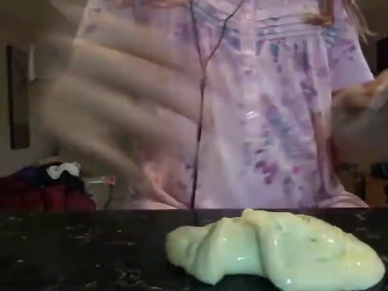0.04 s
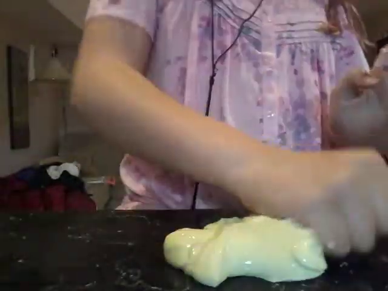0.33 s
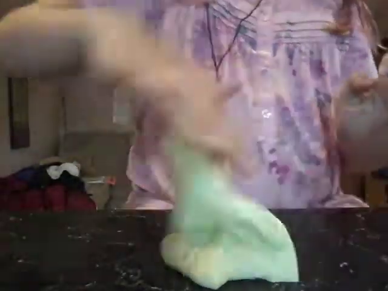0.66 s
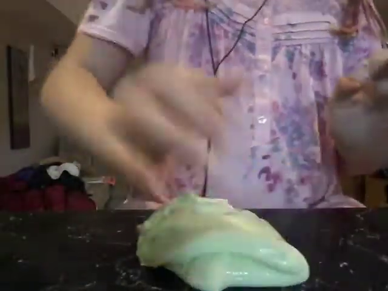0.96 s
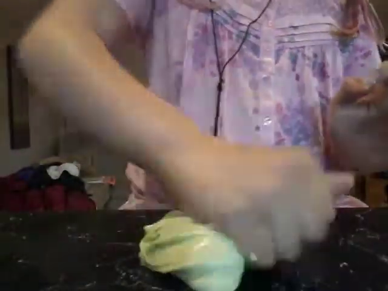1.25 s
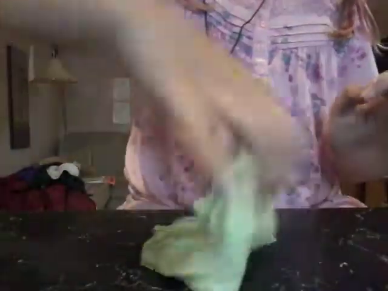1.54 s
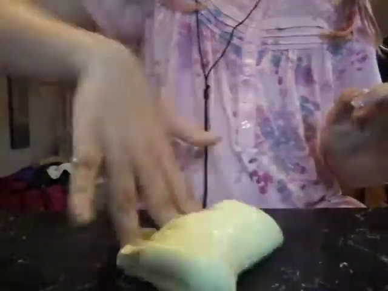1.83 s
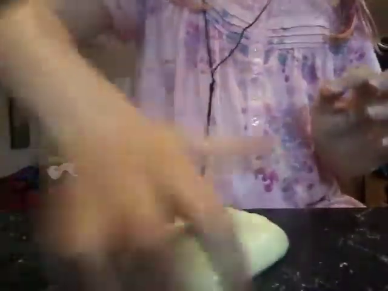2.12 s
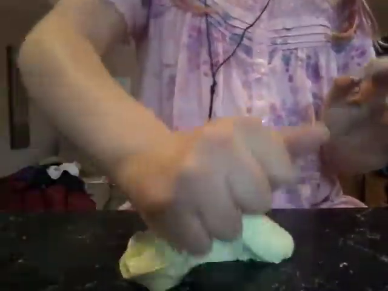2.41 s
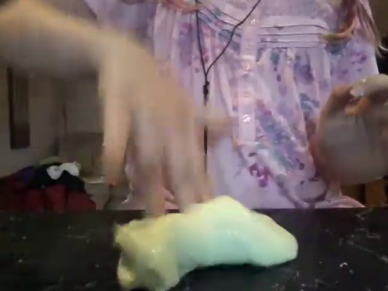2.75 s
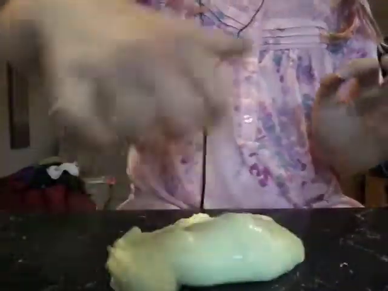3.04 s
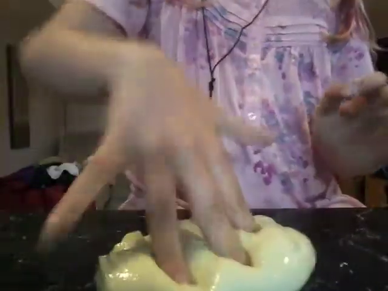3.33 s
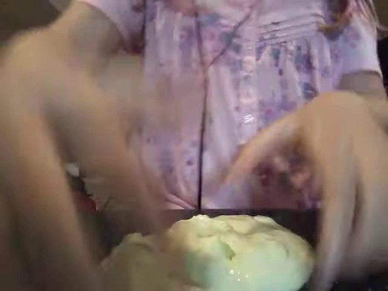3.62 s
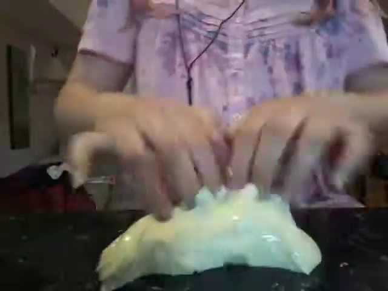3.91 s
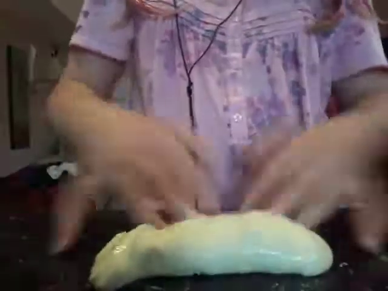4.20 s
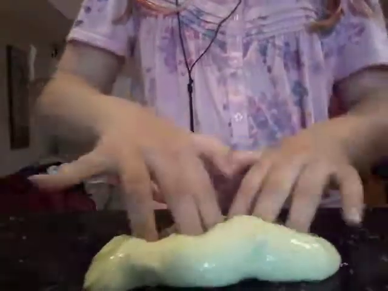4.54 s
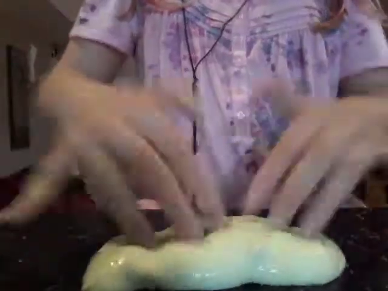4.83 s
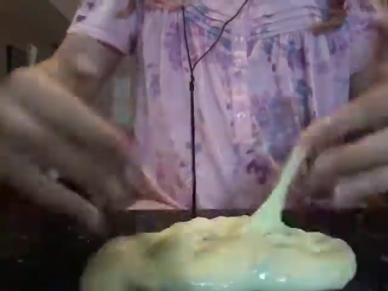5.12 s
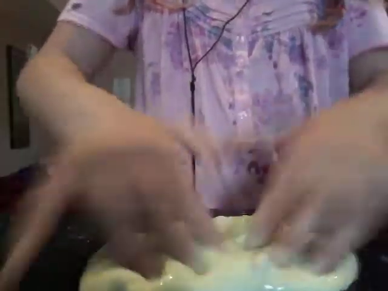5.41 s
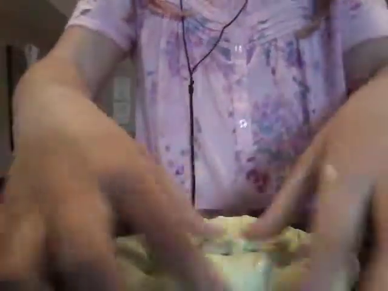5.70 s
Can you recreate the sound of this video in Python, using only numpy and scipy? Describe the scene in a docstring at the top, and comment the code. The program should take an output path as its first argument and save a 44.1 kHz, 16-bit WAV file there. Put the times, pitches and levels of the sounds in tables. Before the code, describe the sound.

Hands work sticky slime on a tabletop, right by the microphone in a small room. Three times a palm lands with a soft thud and lifts, the slime peeling off with a wet crackle and sharp snaps. In the second half, fingers poke in and pull out repeatedly, making louder squelches with hollow pops and light bumps. A last soft thud comes near the end, over very faint room noise.

```python
"""Slime on a tabletop, close up

Sticky slime is pressed, pulled and plucked by hand in a small room, right by the microphone.
Trapped air bursts in sharp snaps and hollow pops, the slime crackles as it peels off the skin,
and the hands land on the table with soft thuds. The microphone rings near 6 kHz."""
import sys
import numpy as np
from scipy import signal
from scipy.fft import rfft, irfft
from scipy.io import wavfile
from scipy.ndimage import uniform_filter1d

SR = 44100
rng = np.random.default_rng(int(sys.argv[2]) if len(sys.argv) > 2 else 0)


def to_wav(s):
    """Save 16-bit WAV."""
    ch = np.atleast_2d(s).T  # columns
    pcm = np.round(np.clip(ch, -1, 1) * 32767)  # PCM
    wavfile.write(sys.argv[1], SR, pcm.astype(np.int16))


N = 254016
EDGE_HZ = 16100  # upper band limit

# The palm comes down and squeezes the slime.
# Each row: start in seconds, level in dB, brightness in Hz, squeeze length in seconds.
PRESSES = [(.231, -29.5, 420, 0.0722), (.344, -35, 329, 0.081), (1.1553, -32, 480, 0.095),
           (2.182, -35.5, 650, 0.145), (3.719, -31, 402.8, 0.091), (5.741, -27, 880, 0.082)]
# The hand lifts and the slime peels off it.
# Each row: start and end in seconds, level in dB, typical tick pitch in Hz.
PULLS = [(.435, .512, -57, 4000), (1.315, 1.458, -54.5, 4800), (2.382, 2.514, -53, 3000)]
# Fingers come out of the slime with a squelch. Each row: start and end in seconds, level in dB.
PLUCKS = [(1.977, 2.007, -49), (2.99, 3.037, -49), (3.466, 3.516, -53), (4.28, 4.339, -34.5),
          (4.688, 4.752, -38.5), (5.09, 5.164, -39.5), (5.489, 5.556, -35.5)]


def amp(db):
    """Decibels to gain."""
    return 10 ** (np.asarray(db) / 20)


def unit_rms(x):
    """Scales to rms 1."""
    return x / np.sqrt(np.mean(x ** 2) + 1e-20)


def curve_at(points, hz):
    """Reads a curve on a log-frequency axis."""
    f, value = np.transpose(points)
    return np.interp(np.log(hz + 1), np.log(f + 1), value)


def seconds(size):
    """A time axis of so many samples."""
    return np.arange(size) / SR


def add(mix, start_s, sound):
    """Mixes a sound in at a time."""
    part = mix[max(round(start_s * SR), 0):][:len(sound)]
    part += sound[:len(part)]


def band(x, hz, kind, order=2):
    """Butterworth filter."""
    return signal.sosfilt(signal.butter(order, np.minimum(hz, SR / 2 - 1), kind, fs=SR, output="sos"), x)


def colour(x, points, size=4096):
    """Causal filter with the given spectrum: it rings only after a click."""
    log_gain = np.log(amp(curve_at(points, abs(np.fft.fftfreq(size, 1 / SR)))))
    minimum_phase = np.exp(np.conj(signal.hilbert(log_gain)))
    taps = np.fft.ifft(minimum_phase).real
    return signal.oaconvolve(x, taps[:size // 2])[:len(x)]


def room_tone(floor_db=-70, waver=0.28):
    """Steady room noise with a little wavering mains hum."""
    # The noise floor. Each row: frequency in Hz, relative density in dB.
    floor = [(20, -15), (62, 2), (95, -6.5), (200, -4.5), (700, -4.5), (1500, -12), (3500, -12),
             (6300, -31.5), (10000, -17), (16000, -17.5)]
    # The mains. Each row: frequency in Hz, rms level in dB.
    partials = [(59.8, -69.5), (120, -83.5), (300, -87)]
    t = seconds(N)
    hum = sum(amp(db) * np.sqrt(2) * np.sin(2 * np.pi * (hz * t + rng.random())) for hz, db in partials)
    hum *= 1 + waver * unit_rms(band(rng.standard_normal(N), 1.5, "lowpass"))
    return hum + amp(floor_db) * unit_rms(colour(rng.standard_normal(N), floor))


def room_tail(build_s=0.0037, size=26460, step=11):
    """Sparse reflections of random sign, each band dying at its own speed."""
    # The room's decay. Each row: frequency in Hz, seconds to fall 60 dB.
    t60 = [(150, 0.5), (1000, 0.3057), (6500, 0.3033), (10000, 0.1733), (16000, 0.459)]
    # The room's colour. Each row: frequency in Hz, gain in dB.
    tone = [(60, 1.5), (200, 0), (1500, -0.5), (5000, 1.5), (6700, -1.5), (9000, 4.5), (16000, -9)]
    taps = np.zeros(size)
    slots = np.arange(0, size - step, step)
    taps[slots + rng.integers(0, step, len(slots))] = rng.choice([-1., 1.], len(slots))
    hz, t, bands = signal.stft(taps, SR, nperseg=256)
    bands = bands * amp(-60 * t / curve_at(t60, hz)[:, None])
    onset = (1 - np.exp(-seconds(size) / build_s)) ** 2
    tail = signal.istft(bands, SR)[1][:size] * onset
    return colour(tail / np.linalg.norm(tail), tone)


def dying_smack(db=-4, top_hz=5000):
    """The room still rings from a smack just before the scene begins."""
    out = np.zeros(N)
    add(out, 0, amp(db) * band(room_tail()[SR // 50:], top_hz, "lowpass"))
    return out


def room(x, tails=3):
    """Direct sound, single echoes from table and body, and a tail that changes as the hands move."""
    # Near surfaces. Each row: delay in seconds, gain.
    echoes = [(.0012, 0.057), (.0021, 0.13), (.0071, 0.14), (.0096, 0.084)]
    # The share thrown into the room. Each row: time in seconds, gain in dB.
    spill = [(.44, -9), (.515, -11), (.93, -9.5), (3, -12.5), (4.3, -10.5), (5.15, -9.5), (5.54, -12.5)]
    out = x.copy()
    for delay, gain in echoes:
        add(out, delay, gain * x)
    sent = x * amp(np.interp(seconds(N), *np.transpose(spill)))
    turn = (np.arange(N) // (SR // 100)) % tails  # the tails take turns every 10 ms
    for k in range(tails):
        out += signal.oaconvolve(sent * (turn == k), room_tail())[:N]
    return out


def blows(settle_s=0.013, settle_hz=197.46, drop_s=0.016, drop_hz=454):
    """The palm lands, then the hand's weight, duller; plucked slime drops back on the table."""
    # Each row: start in seconds, level in dB, brightness in Hz.
    palms = [(start, db, hz) for start, db, hz, _ in PRESSES]
    weights = [(start + settle_s, db - 0.5, settle_hz) for start, db, _ in palms]
    drops = [(start + drop_s, db + 8.5, drop_hz) for start, _, db in PLUCKS]
    return palms + weights + drops


def thuds(slap_db=-20, slap_decay_s=0.009, low_cut_hz=130, detune=0.2):
    """A cushioned blow rings the table, detuned as the hand loads it; wet skin adds a faint slap."""
    # The tabletop's modes. Each row: frequency in Hz, relative level in dB, decay in seconds.
    modes = [(184.8, -21, 0.024), (214.77, -12.5, 0.011), (299.1, -11, 0.0032), (571, -1.5, .003),
             (1620, 1, 0.0013)]
    out, t = np.zeros(N), seconds(size=6000)
    for start, db, bright_hz in blows():
        loads = 1 + detune * rng.uniform(-0.9, 1, len(modes))
        ring = sum(amp(mode_db) * np.sin(2 * np.pi * hz * load * t) * np.exp(-t / decay)
                   for (hz, mode_db, decay), load in zip(modes, loads))
        knock = band(ring, bright_hz, "lowpass", order=1)
        slap = band(rng.standard_normal(len(t)), 2 * bright_hz, "lowpass", order=1)
        slap *= np.exp(-t / slap_decay_s)
        add(out, start, amp(db) * (knock / abs(knock).max() + amp(slap_db) * slap))
    return band(out, low_cut_hz, "highpass", order=5)


def showers(squeeze_hz=8200, sag_hz=4946, seethe_hz=1384, squelch_hz=2295):
    """Every spell of crackle that the hands cause."""
    spells = []  # Each row: start and end in seconds, level in dB, typical tick pitch in Hz.
    for start, db, _, length in PRESSES:
        spells.append((start, start + length, db - 33, squeeze_hz))  # air fizzes from under the palm
    for start, end, db, hz in PULLS:
        sag_start = end + 0.04
        spells += [(start, end, db, hz),
                   (sag_start, sag_start + 0.135, -64, sag_hz)]  # stretched threads sag back
    for start, end, db in PLUCKS:
        spells += [(start - 0.1, start, db - 40, seethe_hz),  # slime seethes round the fingers,
                   (start - 0.012, start, db - 21.5, squelch_hz),  # starts to let go,
                   (start, end, db, squelch_hz)]  # then squelches
    return spells


def peeling(ticks_per_s=1300, spread_octaves=2, spread_db=4.5, decay_cycles=1.5):
    """Threads and tiny bubbles let go of skin and table: showers of short rings of mixed size and pitch."""
    out, t = np.zeros(N), seconds(SR // 100)
    for start, end, db, hz in showers():
        length = end - start
        shower = np.zeros(round(length * SR) + len(t))
        for place, size, up, down in rng.random((int(length * ticks_per_s), 4)):
            swell = np.sqrt(np.sin(np.pi * place))
            size_db = spread_db * min(-np.log(1 - size), 3)  # many small ticks, a few large
            pitch = min(hz * 2 ** (spread_octaves * (up - down)), EDGE_HZ)
            tick = np.sin(2 * np.pi * pitch * t) * np.exp(-t * pitch / decay_cycles)
            add(shower, place * length, swell * amp(size_db) * unit_rms(tick))
        add(out, start, amp(db) * unit_rms(shower))
    return out


def taut(time_s):
    """Whether a pull is stretching the slime at this moment."""
    return any(start <= time_s <= end for start, end, _, _ in PULLS)


def pops(rise=0.036, opening_s=0.00065, roughness=0.6075, torn_cycles=1, resting_cycles=3.496):
    """An air pocket rings as a damped cavity; its pitch rises as the opening widens."""
    # Pockets venting round the fingers. Each row: start in seconds, level in dB, pitch in Hz.
    pockets = [(0.3427, -22.5, 4260), (0.4395, -13, 1090), (0.4673, -24.5, 859), (.757, -42, 620),
               (.9336, -25.5, 1333), (0.9352, -21, 4420), (.937, -30, 796), (1.325, -19, 3920),
               (1.389, -6.5, 4080), (1.51, -45.5, 925), (1.9745, -27.5, 515.5), (1.987, -34.5, 436.7),
               (2.397, -32.5, 818), (3.0007, -23, 800.4), (3.008, -32, 589), (3.009, -25, 3540),
               (3.445, -39, 794), (3.4594, -29.5, 732.3), (3.4911, -26.5, 2631), (3.509, -34.5, 636.5),
               (4.275, -30, 537), (4.297, -19.5, 839), (4.681, -22.5, 472.3), (4.69, -24, 676.4),
               (4.693, -28, 320.5), (4.702, -22, 747.6), (5.11, -21.5, 645.7), (5.1197, -19, 789),
               (5.139, -15.5, 1286), (5.49, -32.5, 556.5), (5.5235, -18, 1092), (5.547, -19.5, 2255)]
    out, t = np.zeros(N), seconds(size=3000)
    for start, db, hz in pockets:
        decay = (torn_cycles if taut(start) else resting_cycles) / hz  # a pull tears it wide open
        fade = np.exp(-t / decay)
        onset = 1 - np.exp(-t / opening_s)
        pitch = hz * (1 + rise * (1 - 2 * fade))
        flutter = unit_rms(band(rng.standard_normal(len(t)), [hz / 2, hz * 2], "bandpass"))
        ring = np.sin(2 * np.pi * np.cumsum(pitch) / SR) + roughness * flutter
        add(out, start, amp(db) * ring * fade * onset)
    return band(out, 120, "highpass", order=1)


def film_tear(decay_s, size=441):
    """A noise burst of tearing film, its spectrum levelled so that chance does not colour it."""
    burst = rng.standard_normal(size) * np.exp(-seconds(size) / decay_s)
    spectrum = rfft(burst, 2 * size)
    spectrum /= np.sqrt(uniform_filter1d(abs(spectrum) ** 2, size=25) + 1e-12)
    return irfft(spectrum)[:size]


def snaps(trim_db=-1, stretched_hz=2450, resting_hz=2156, band_ratio=2.081):
    """Each film tears with a crack and a fizz; the bubble behind it rings, higher when stretched."""
    # Films of slime bursting. Each row: start in seconds, crack level in dB,
    # bubble and fizz levels in dB relative to the crack, decay in seconds.
    films = [(0.3298, -57.5, -4, -3.5, 0.00025), (0.343, -62, 9, 10, 0.0005),
             (.377, -59.5, 15, -19.5, 0.00187), (0.4158, -48, 0, 1, 0.00039),
             (0.4402, -36, 8.5, 6.5, 0.0002), (.4664, -41.5, 1, 2.5, 0.00063),
             (.4997, -37.5, -4, 7.5, 0.00073), (0.5137, -28, -14, -4, 0.00068),
             (0.6033, -53.5, 1, -10.5, 0.0012), (0.7569, -66.5, 11, -3.5, 0.0076),
             (0.9342, -37, -13, -8, 0.00115), (1.1545, -66.5, 11.5, -4, 0.00127),
             (1.3224, -46, 9, 4, 0.003), (1.3474, -52, 7.5, -11, 0.00085), (1.3653, -46, 6, 6.5, 0.00107),
             (1.3768, -43.5, -2.5, 2.5, 0.00031), (1.3897, -34, -6.5, 4.5, 0.00054),
             (1.431, -33, -6, -1, 0.0013), (1.5098, -58, -2, 1, .0023), (1.9739, -50, 3, -7.5, 0.001),
             (1.978, -50, 15.5, 4.5, 0.00165), (1.988, -53.5, 8.5, -10.5, .0008),
             (2.3094, -60.5, -10.5, -10, 0.0013), (2.3533, -53.5, 0.5, -4.5, 0.00164),
             (2.397, -57, 13, 6, 0.00046), (2.412, -51.5, 7.5, 6, 0.001), (2.4251, -53, 9, 4, 0.0025),
             (2.434, -48.5, -8.5, 5.5, 0.0005), (2.4482, -50.5, -3.5, 5.5, 0.00055),
             (2.464, -44.5, 6.5, 13, 0.000294), (2.4733, -42, -6, 4.5, 0.00074),
             (2.4862, -41.5, -0.5, 5.5, 0.00047), (2.753, -65.5, 2.5, -10, 0.00148),
             (2.9961, -47, -4, -2.5, 0.0039), (3.164, -74.5, -20, -7.5, 0.00082),
             (3.46, -46, 0.5, 1.5, .0003), (3.4891, -45, 4.5, -5.5, 0.0016),
             (3.5014, -50.5, -3.5, 4, .0014), (3.7967, -52, -4.5, 0.5, 0.00035),
             (3.8891, -67.5, -3.5, 1.5, .0004), (3.907, -68, -7, -5.5, 0.00044),
             (4.2744, -35.5, -1.5, -9.5, 0.00051), (4.295, -26.5, 0.5, -5, 0.00154),
             (4.3148, -35.5, 6.5, 3, .001), (4.682, -27, -16, -3.5, 0.00036),
             (4.7094, -24.5, -3, -6.5, 0.000485), (4.7348, -29, 0, 1.5, 0.0011),
             (5.0925, -38.5, 4, -3, .0003), (5.1196, -26.5, -4.5, -9.5, 0.00093),
             (5.1399, -23.5, 1, -2, 0.0017), (5.4888, -44.5, 2.5, 5, .0011), (5.5021, -39, 6, 6.5, 0.00091),
             (5.5107, -38, 10.5, 6.5, 0.00186), (5.5233, -44, -0.5, 8.5, 0.00053),
             (5.5378, -24, 0.5, -3, 0.00143), (5.739, -59.5, 11, 1.5, 0.0032)]
    out = np.zeros(N)
    for start, db, bubble_db, fizz_db, decay in films:
        hz = stretched_hz if taut(start) else resting_hz
        tear = film_tear(decay)
        crack = unit_rms(band(tear, [5200, 8000], "bandpass"))
        bubble = amp(bubble_db) * unit_rms(band(tear, [hz / band_ratio, hz * band_ratio], "bandpass"))
        fizz = amp(fizz_db) * unit_rms(band(tear, [8500, 16000], "bandpass", order=3))
        add(out, start, amp(db + trim_db) * (crack + bubble + fizz))
    return out


def wet_chirp(x, hz=3950, width_hz=1500, stages=5):
    """A chain of all-pass resonances: pitches near hz arrive late, so each click chirps wetly."""
    radius = np.exp(-np.pi * width_hz / SR)
    poles = [1, -2 * radius * np.cos(2 * np.pi * hz / SR), radius * radius]
    return signal.sosfilt([poles[::-1] + poles] * stages, x)


def scene():
    """Slime and table close by, the small room behind them, in mono."""
    slime = wet_chirp(snaps() + peeling()) + pops()
    return (room(slime + thuds()) + dying_smack() + room_tone())[None]


def record(dry):
    """The microphone's resonance, soft overload on the sharpest snaps, and the band limit."""
    # The microphone's response. Each row: frequency in Hz, gain in dB.
    response = [(20, -18.5), (100, 3), (3500, -1.5), (5000, 5.5), (6300, 13.5), (7100, 6), (8300, -5.5),
                (10000, -5), (14000, -4.5), (16000, -4.5)]
    ceiling = 0.75
    heard = colour(dry[0], response)
    heard = heard / (1 + (heard / ceiling) ** 4) ** (1 / 4)
    band_limit = signal.firwin(255, EDGE_HZ, window=("kaiser", 8), fs=SR)
    return signal.oaconvolve(heard, band_limit, "same")[None]


dry = scene()
out = record(dry)
to_wav(out)
```